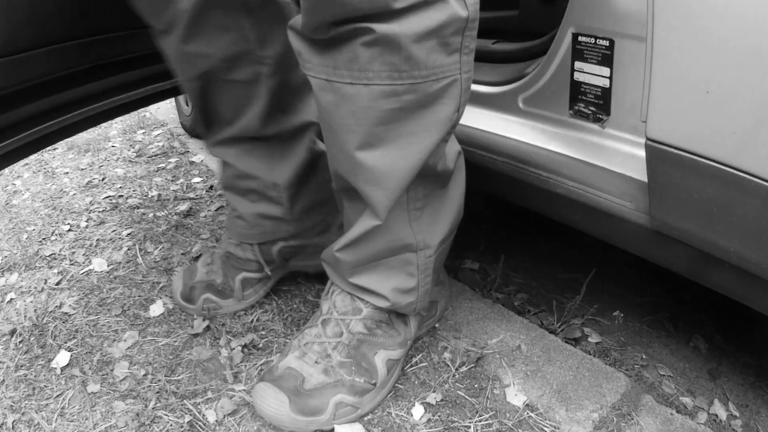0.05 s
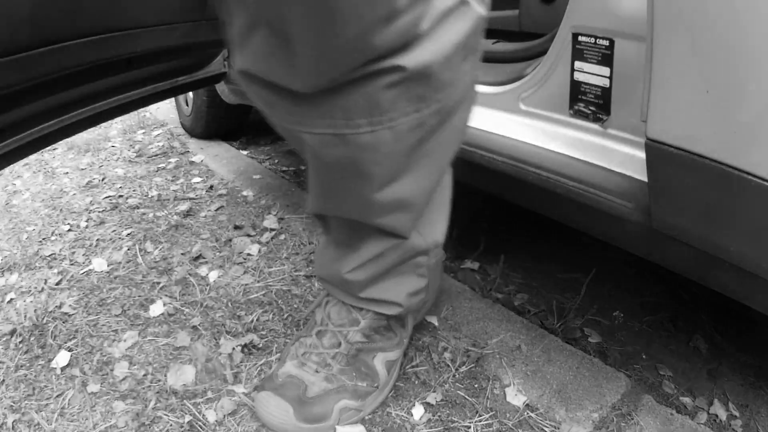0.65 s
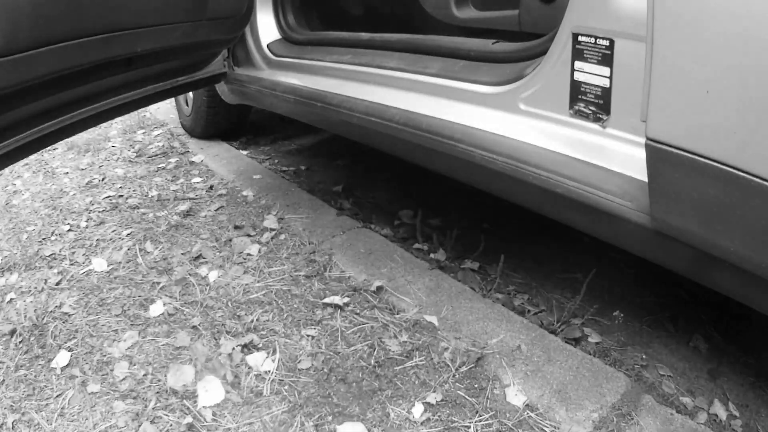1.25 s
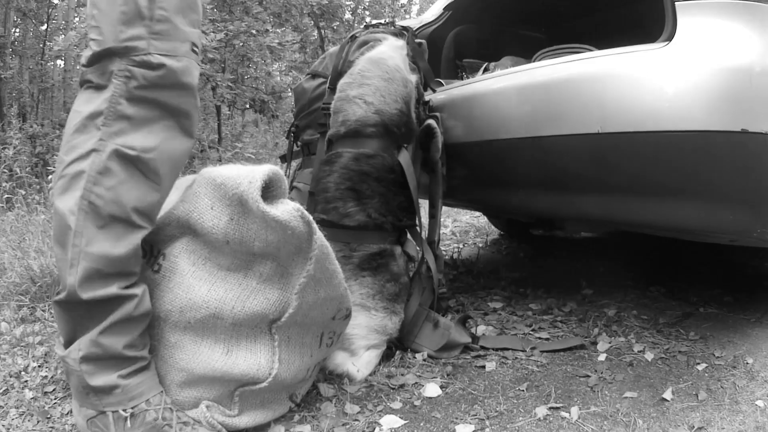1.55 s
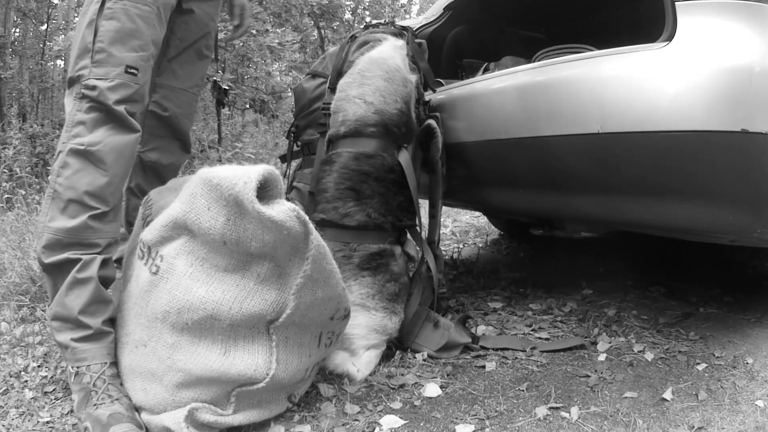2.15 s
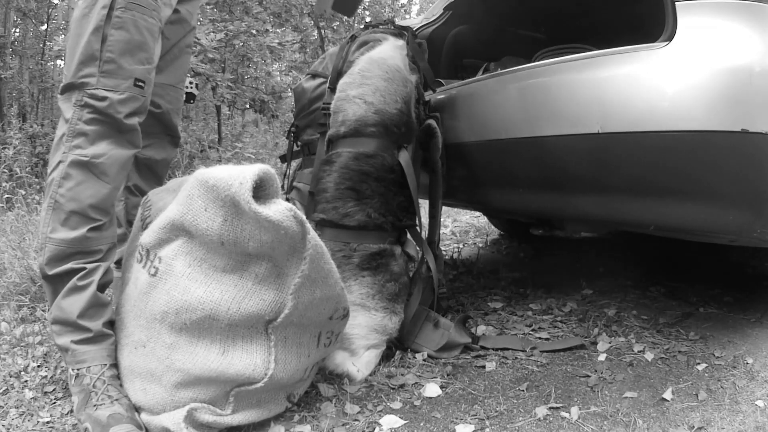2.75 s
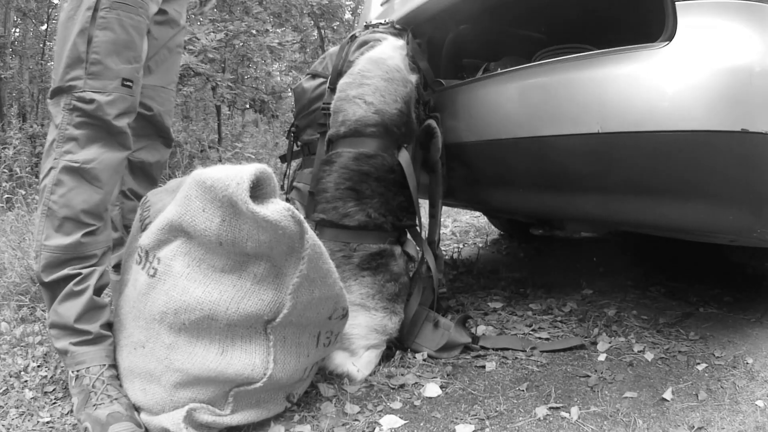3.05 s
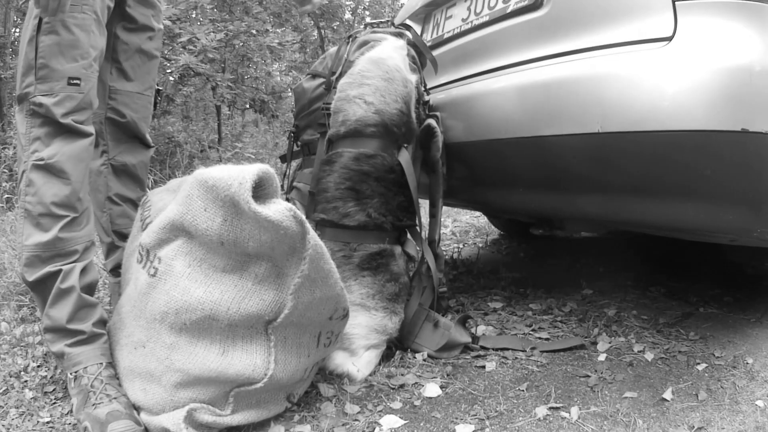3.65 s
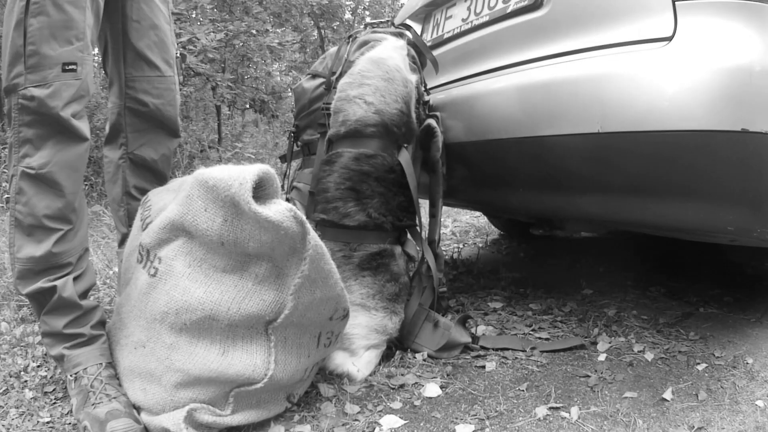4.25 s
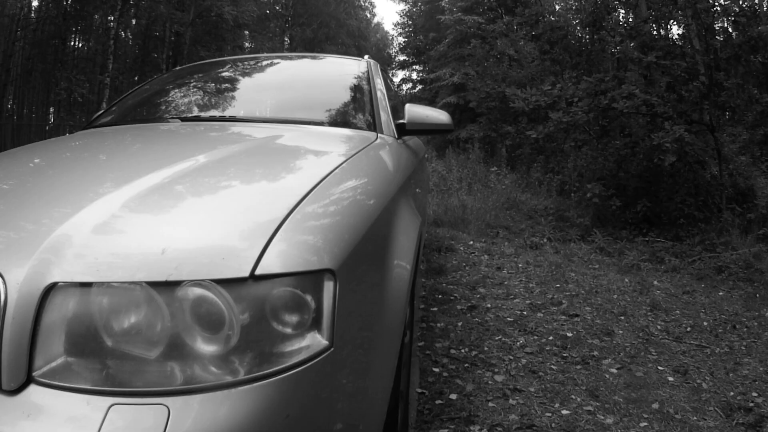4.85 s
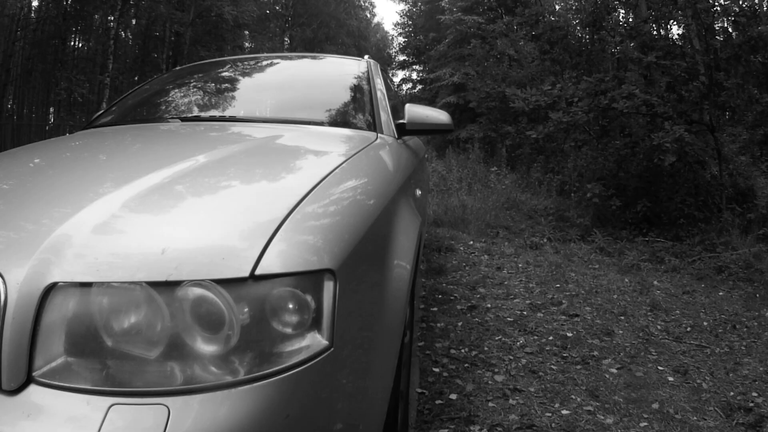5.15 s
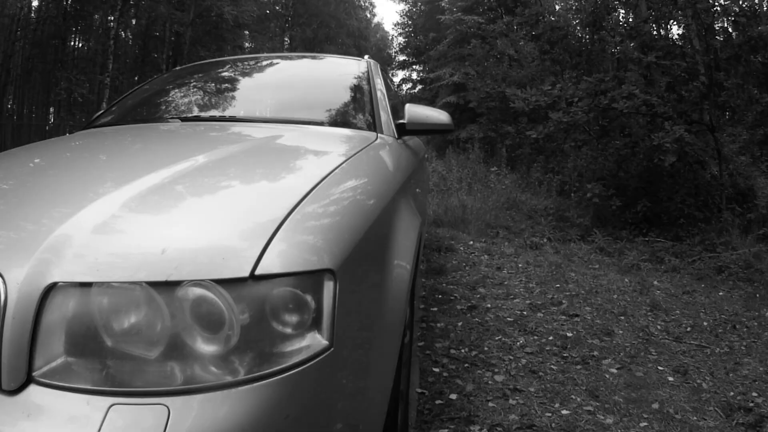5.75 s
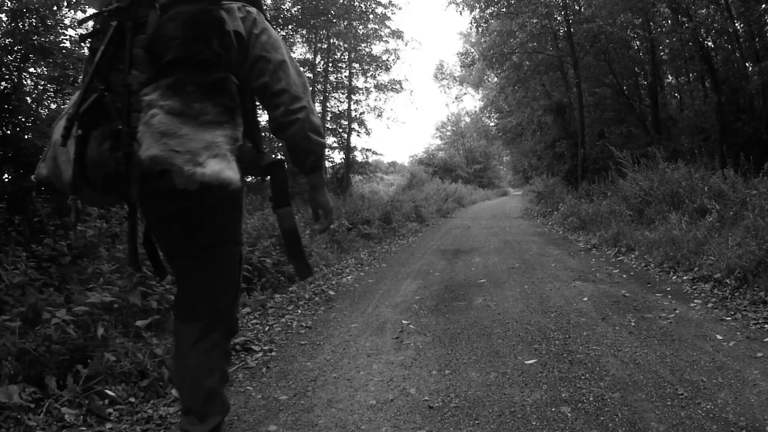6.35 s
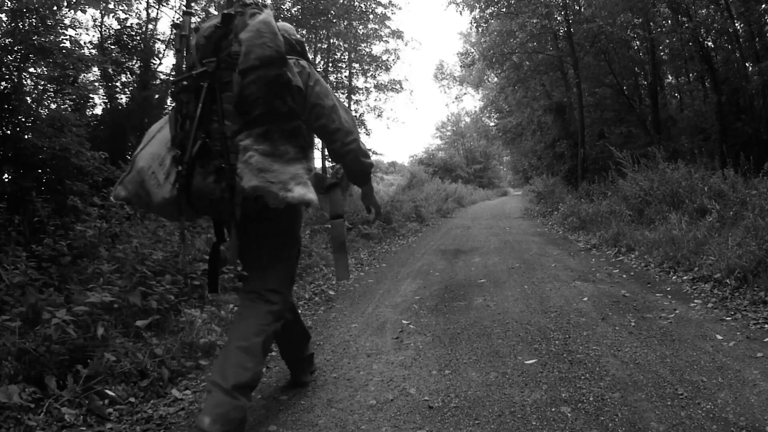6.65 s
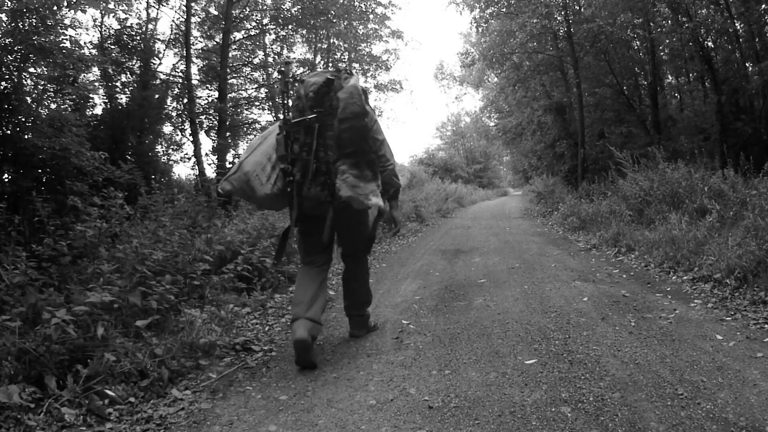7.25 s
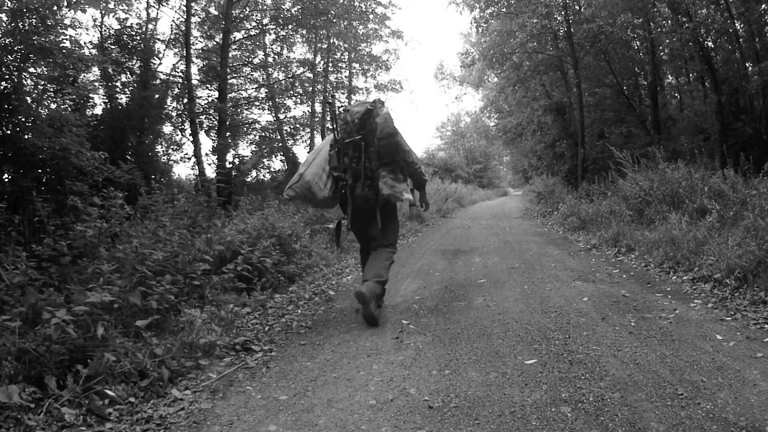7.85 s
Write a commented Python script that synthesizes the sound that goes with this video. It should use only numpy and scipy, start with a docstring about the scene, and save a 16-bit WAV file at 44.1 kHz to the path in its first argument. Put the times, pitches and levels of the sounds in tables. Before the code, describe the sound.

Leafy boot scuffs outdoors, followed by a trunk lid slamming, car door locks clunking and a few crunching steps on gravel.

```python
"""Boots shuffle on dry leaves and gravel beside a parked car, then crunch away along a woodland track.
Soles thud, grit grinds in tiny fractures, stones snap and the hiker's trouser legs swish.
Before the walk, a buckle tinkles, the trunk lid swings down and slams with a ring of sheet metal,
and the central locking clunks. A small stereo microphone with a peaky treble picks it all up
over a soft outdoor rush and its own hiss."""
import sys
import numpy as np
from scipy import signal
from scipy.fft import rfft, irfft
from scipy.io import wavfile
from scipy.ndimage import uniform_filter1d

SR = 44100
rng = np.random.default_rng(int(sys.argv[2]) if len(sys.argv) > 2 else 0)


def generate_wav(signal):
    """Clip the signal to [-1, 1] and save it as 16-bit WAV at the path in sys.argv[1]."""
    frames = np.transpose(np.atleast_2d(signal))
    scaled = np.clip(frames, -1, 1) * 32767
    pcm = np.round(scaled).astype(np.int16)
    wavfile.write(sys.argv[1], SR, pcm)


N = 348100
TIME = np.arange(N) / SR

# Tone colours of a dull sole, midrange gravel and crisp grit, also lent to the car and the buckle.
# Each row: frequency in Hz, relative level in dB.
SOLE_TONE = [(60, -18.5), (140, 0.5), (330, 1.5), (520, 3), (750, -4.5), (1100, -36)]
GRAVEL_TONE = [(400, -12), (750, 3.5), (1400, 0), (2300, -2), (3200, -6.5), (4500, -41)]
GRIT_TONE = [(1500, -19.5), (3000, 0), (5500, 1.5), (9500, -5.5), (12000, -26), (16000, -23)]
# Rustle of ground and gear under the moves. Each row: time in seconds, mid and treble levels in dB.
RUSTLE_BED = [(0, -45, -45), (.35, -52, -52), (.65, -52.5, -52.5), (1.1, -49.5, -53), (1.52, -54, -65),
              (1.62, -45, -51), (2.15, -49.5, -56), (2.5, -58, -60), (2.95, -54, -57), (3.601, -79.5, -81),
              (5.98, -60, -69), (6.08, -46, -53.5), (6.6, -46.5, -55), (6.9, -51.5, -55.5),
              (7.89, -49.5, -57)]


def boots(track_from_s=5.5, pebble_db=1.5, track_grind_db=-3, loose_db=-42):
    """The sole thuds and the ground grinds: dry leaves by the car, grit and pebbles on the track."""
    # Airy crackle of dry leaves. Each row: frequency in Hz, relative level in dB.
    leaf_tone = [(1800, -11.5), (3200, -3), (8500, -2.5), (11000, -18), (16000, -25.5)]
    sole, gravel, crisp = footwork()
    on_track = TIME > track_from_s
    thud = grains(per_s=630, spread_db=3.5, grain_s=0.0012, width_db=-18.5, bed_db=-3)
    grind = grains(per_s=2000, spread_db=4.5, grain_s=0.00044, width_db=-11.5, bed_db=-4)
    leaves = grains(per_s=2400, spread_db=3.5, grain_s=0.00077, width_db=-1.5, bed_db=-0.5)
    grit = grains(per_s=830, spread_db=2.5, grain_s=0.00039, width_db=-4.5, bed_db=-3.5)
    ground = colour(sole * thud, SOLE_TONE)
    ground += colour(gravel * grind * from_db(track_grind_db * on_track), GRAVEL_TONE)
    # Pebbles only move under real weight.
    shifting = from_db(pebble_db) * gravel ** 2 / (gravel + from_db(loose_db))
    track = colour(on_track * crisp * grit, GRIT_TONE) + on_track * shifting * pebbles()
    return ground + colour(~on_track * crisp * leaves, leaf_tone) + track


def footwork(low_db=-3):
    """Envelopes of sole, gravel and crackle: the single moves on top of the rustle bed."""
    mid_db, treble_db = in_time(RUSTLE_BED)
    return np.hypot(swells(shuffles() + strides()), from_db([mid_db + low_db, mid_db, treble_db]))


def shuffles(leaf_db=-1, muffling=0.21):
    """The more weight on a boot, the more it thuds and the less the leaves crackle."""
    # A boot drags or is set down. Each row: peak time, rise and fall in seconds, level and weight in dB.
    drags = [(0.258, 0.018, 0.012, -33, -10), (.81, 0.077, 0.14, -37.5, -7),
             (1.205, 0.023, 0.028, -28.5, -5.5), (1.227, .012, 0.011, -25, 7),
             (1.265, 0.0038, 0.0056, -33.5, 7.5), (1.403, 0.038, 0.031, -33, -1.5),
             (1.586, 0.019, 0.0077, -38.5, 10.5), (1.905, 0.11, 0.067, -35, 0.5),
             (2.317, 0.0041, 0.012, -36, 7)]
    return [(s, rise, fall, db + weight, db, db + leaf_db - muffling * weight)
            for s, rise, fall, db, weight in drags]


def strides(tread_db=-38.5, heel_lead_s=0.076, heel_db=-3, push_grit_db=2):
    """The heel lands softly, the sole rolls flat, then the trailing boot pushes off."""
    # Each row: time the sole rolls flat in seconds, gravel and grit levels in dB.
    steps = [(6.17, -41, -44.5), (6.717, -37.5, -39), (7.306, -38.5, -36), (7.873, -32.5, -40)]
    # Each row: peak time in seconds, level in dB, weight on the sole in dB.
    push_offs = [(6.391, -40.5, -4), (7.0, -40, 1.5), (7.538, -38, 4)]
    heel_s, roll_s, push_s = (0.01, 0.027), (0.041, 0.035), (0.011, 0.016)  # rise and fall
    heels = [(s - heel_lead_s, *heel_s, tread_db + heel_db, gravel + heel_db, grit + heel_db)
             for s, gravel, grit in steps]
    rolls = [(s, *roll_s, tread_db, gravel, grit) for s, gravel, grit in steps]
    pushes = [(s, *push_s, db + weight, db, db + push_grit_db) for s, db, weight in push_offs]
    return heels + rolls + pushes


def pebbles(per_s=170, spread_db=5.5, low_hz=1100, high_hz=4800, cycles=6, count=14):
    """Small stones click against each other, each at its own pitch, in a stream of even level."""
    hits = impacts(per_s, spread_db) * rng.choice([-1, 1], N)
    which = rng.integers(0, count, N)
    pitches = np.geomspace(low_hz, high_hz, count)
    clicks = sum(ring(hits * (which == k), hz, cycles / hz) for k, hz in enumerate(pitches))
    clicks = signal.lfilter(*signal.butter(2, low_hz / 2, "high", fs=SR), clicks)
    return clicks / np.sqrt(uniform_filter1d(clicks ** 2, size=2600) + 1e-4)


def stones(cycles=5.5, settle_s=0.0016, snap_t60=0.015, scatter_db=-19, scatter_t60=0.08):
    """Each stone gives a sharp snap, rings for a few cycles and scatters grit around it."""
    # The loudest knocks of stones, twigs and gear. Each row: start in seconds, level in dB, pitch in Hz.
    knocks = [(.017, -24.5, 4200), (.079, -21, 840), (.248, -17, 5260), (.309, -27, 600), (.642, -16, 850),
              (1.174, -9, 684), (1.585, -23, 4220), (1.767, -23.5, 5160), (1.872, -10.5, 1500),
              (1.874, -11, 296), (2.048, -26.5, 2000), (2.317, -15.5, 1780), (2.578, -27.5, 1170),
              (2.77, -26.5, 253), (2.771, -22, 980), (2.879, -26, 300), (6.384, -19.5, 1210),
              (6.449, -22, 1430), (6.533, -18, 1620), (6.638, -19.5, 1690), (6.7007, -6, 1370),
              (6.736, -18.5, 1520), (6.774, -23, 2640), (7.122, -14.5, 4750), (7.126, -20.5, 413),
              (7.178, -23, 4700), (7.236, -20, 5030), (7.251, -16, 2300), (7.309, -14, 1380),
              (7.322, -15, 2360), (7.799, -24.5, 900)]
    out, snaps, t = np.zeros((2, N)), np.zeros((2, N)), TIME[:3000]
    for s, db, hz in knocks + ticks():
        snap_db = -11.5 + 7.5 * np.log2(hz / 1500)  # smaller stones sound higher and sharper
        t60 = cycles / hz + settle_s
        knock = np.sin(2 * np.pi * hz * t) * dying(t, t60)
        knock -= 0.3 * np.sin(2 * np.pi * 2.4 * hz * t) * dying(t, t60 / 2)
        snap, grit = rng.standard_normal((2, 2, len(t)))
        band = signal.butter(2, [hz / 2, min(hz * 1.5, SR / 3)], "band", fs=SR, output="sos")
        grit = rms_one(signal.sosfilt(band, pair(*grit, -37.5)))
        add(out, s, from_db(db) * (knock + from_db(scatter_db) * grit * dying(t, scatter_t60)))
        add(snaps, s, from_db(db + snap_db) * pair(*snap, -4.5) * dying(t, snap_t60))
    return out + 0.55 * colour(snaps, GRIT_TONE)


def ticks(count=160, per_s=11, above_rustle_db=17, spread_db=5, low_hz=900, high_hz=5500):
    """Small stones and leaves tick at random, riding the rustle's treble; gives rows for stones()."""
    wait, strength, pitch = rng.random((count, 3)).T
    s = np.cumsum(-np.log(1 - wait)) / per_s
    at, _, treble_db = np.transpose(RUSTLE_BED)
    db = np.interp(s, at, treble_db) + above_rustle_db + spread_db * (2 * strength - 1)
    hz = low_hz * (high_hz / low_hz) ** pitch
    return list(np.transpose([s, db, hz])[s < TIME[-1]])


def lid_swing():
    """Hinges and rubber rub as the lid comes down."""
    # Each row: peak time, rise and fall in seconds, then low, mid and high levels in dB.
    rubs = [(3.19, 0.0042, 0.019, -28, -23.5, -31.5), (3.222, 0.028, 0.023, -30, -29.5, -33),
            (3.262, 0.018, 0.012, -22.5, -22.5, -28.5)]
    low, mid, high = swells(rubs)
    rub = colour(low * noise(-25.5), SOLE_TONE) + colour(mid * noise(-13), GRAVEL_TONE)
    scrape = grains(per_s=1800, spread_db=9, grain_s=0.0007, width_db=-5, bed_db=-0.5)
    return rub + colour(high * scrape, GRIT_TONE)


def lid_slam(thump_t60=0.045, panel_t60=0.08, latch_t60=0.056, force_db=3, modes_db=-10,
             seal_s=0.0031, crack_db=8, crack_t60=0.006):
    """A volley of contacts with latch, seal and stops shakes the shell and rings the sheet metal."""
    # Each row: start in seconds, then thump, panel and latch levels in dB.
    contacts = [(3.3083, -21, -18.5, -21), (3.3209, -24, -25.5, -21), (3.337, -30, -21, -33),
                (3.3505, -12.5, -17.5, -26), (3.359, -8.5, -37.5, -26.5), (3.376, -8, -20, -25.5),
                (3.395, -24.5, -25.5, -24), (3.431, -44, -30.5, -33)]
    # Sheet-metal modes. Each row: frequency in Hz, relative level in dB, 60 dB decay time in seconds.
    lid_modes = [(117, -4.5, 0.19), (142, -2, 0.22), (314, -7, 0.2), (510, 0.5, 0.18), (714, -4, 0.13),
                 (1170, -4, 0.13), (1370, -5.5, 0.087), (1560, -15, 0.13), (2000, -13.5, 0.13)]
    # Deep thump, hollow panel, bright latch. Each row: frequency in Hz, relative level in dB.
    thump_tone = [(40, -11), (140, 7.5), (250, 6.5), (400, -6.5), (700, -42.5)]
    panel_tone = [(180, -7.5), (330, 2.5), (650, -2), (850, -5.5), (1300, -0.5), (2200, -9.5),
                  (3500, -33.5)]
    latch_tone = [(1800, -9), (3300, 5), (5200, 4.5), (10500, -7), (13000, -34.5)]
    s, thump_db, panel_db, latch_db = np.transpose(contacts)
    out, t = np.zeros((2, N)), TIME[:SR // 2]
    cushioned = dying(t, thump_t60) * (1 - np.exp(-t / seal_s))  # the rubber seal slows the attack
    layers = [(thump_db, cushioned, thump_tone, -20),
              (panel_db, dying(t, panel_t60), panel_tone, -11),
              (latch_db, dying(t, latch_t60), latch_tone, -2)]
    for levels, envelope, tone, width_db in layers:
        power = np.zeros(N)
        for at, db in zip(s, levels):
            add(power, at, (from_db(db + force_db) * envelope) ** 2)
        shake = colour(noise(width_db), tone)
        shake_power = uniform_filter1d(np.mean(shake ** 2, axis=0), size=500)
        out += shake * np.sqrt(power / (shake_power + 1e-9))
    for at, db in zip(s[:2], latch_db):  # the first two contacts are the hard steel of the latch
        crack = uniform_filter1d(rng.standard_normal((2, len(t))), size=2)
        add(out, at, from_db(db + crack_db) * dying(t, crack_t60) * crack)
    for hz, db, t60 in lid_modes:
        clicks = np.zeros(N)
        strength_db = panel_db + db + modes_db + rng.normal(0, 3.8, len(s))
        clicks[np.round(s * SR).astype(int)] = from_db(strength_db) * rng.choice([-1, 1], len(s))
        out += ring(clicks, hz, t60)
    return out


def trapped_air(at_s=3.348, hz=58, db=-20, t60=0.12):
    """The air shut in behind the lid gives one low push."""
    return from_db(db) * np.sin(2 * np.pi * hz * (TIME - at_s)) * dying(TIME - at_s, t60)


def central_lock():
    """A relay clicks, the lock motors shove their bolts twice, and the hollow doors boom on."""
    # Each row: peak time, rise and fall in seconds, then boom, whirr and rattle levels in dB.
    clunks = [(4.601, .0006, 0.0023, -60, -53, -40.5), (4.62, 0.0083, 0.0064, -30, -35.5, -52),
              (4.665, 0.02, 0.02, -24, -36, -51), (4.72, .03, .05, -44, -57, -72)]
    # Body of a hollow door. Each row: frequency in Hz, relative level in dB.
    door_tone = [(50, -22), (140, 7.5), (330, -3.5), (480, 6.5), (600, -7.5), (720, 1.5), (1300, -31)]
    boom, whirr, rattle = swells(clunks)
    doors = colour(boom * noise(-21), door_tone)
    return doors + colour(whirr * noise(-9), GRAVEL_TONE) + colour(rattle * noise(-5), GRIT_TONE)


def buckle(tick_db=-5, tick_t60=0.042, tilt_pivot_hz=7420):
    """Every touch gives a dry tick and rings the modes unevenly; where it lands sets the brightness."""
    # Each row: start in seconds, level in dB, tilt in dB per octave.
    touches = [(1.637, -27, 1), (2.104, -34.5, 1), (4.075, -49, -9), (4.321, -43.5, -8), (4.347, -54, -9),
               (4.402, -43.5, 2)]
    # Each row: frequency in Hz, relative level in dB, 60 dB decay time in seconds.
    buckle_modes = [(5220, -24, 0.023), (7420, -5.5, 0.037), (9630, -8.5, 0.027), (11270, -14, 0.027)]
    s, level_db, tilt = np.transpose(touches)
    out, tick_envelope = np.zeros((2, N)), np.zeros(N)
    for hz, db, t60 in buckle_modes:
        clicks = np.zeros((2, N))
        strength_db = level_db + db + tilt * np.log2(hz / tilt_pivot_hz)
        clicks[:, np.round(s * SR).astype(int)] = from_db(strength_db + rng.normal(0, 9.3, (len(s), 2)).T)
        out += ring(clicks, hz, t60)
    for at, db in zip(s, level_db):
        add(tick_envelope, at, from_db(db + tick_db) * dying(TIME[:SR // 10], tick_t60))
    return out + colour(tick_envelope * noise(1), GRIT_TONE)


def trousers():
    """Stiff cloth slides over cloth with a smooth, airy hiss."""
    # The legs brush past each other. Each row: peak time, rise and fall in seconds, level in dB.
    brushes = [(.23, .018, .025, -36), (.89, 0.091, 0.11, -45.5), (1.38, 0.061, 0.044, -40)]
    # Each row: frequency in Hz, relative level in dB.
    cloth_tone = [(6500, -13), (9000, 4), (15000, -24)]
    swish, = swells(brushes)
    return colour(swish * noise(1.5), cloth_tone)


def whistle(waver=0.023):
    """One faint, high, slightly unsteady note."""
    # Each row: time in seconds, pitch in Hz, level in dB.
    contour = [(2.13, 2240, -73), (2.16, 2270, -45), (2.21, 2250, -45), (2.25, 2300, -63)]
    hz, db = in_time(contour)
    wobble = rms_one(uniform_filter1d(rng.standard_normal(N), size=200))
    sounding = (TIME > contour[0][0]) & (TIME < contour[-1][0])
    return from_db(db) * sounding * np.sin(2 * np.pi * np.cumsum(hz * (1 + waver * wobble)) / SR)


def surroundings(dry, near_db=-13, near_t60=0.068, far_db=-25, far_t60=0.35, far_cut_hz=3500):
    """Quick scatter from ground and car, then a faint dull tail from the trees."""
    t = TIME[:SR // 2]
    near, far = rng.standard_normal((2, 2, len(t)))
    side = np.diff(near[1], prepend=0)  # close ports differ only in the treble
    near = pair(near[0], side, -0.5) * dying(t - 0.003, near_t60)
    far = signal.lfilter(*signal.butter(1, far_cut_hz, fs=SR), pair(*far, -20)) * dying(t - 0.02, far_t60)
    echo = (from_db(near_db) * rms_one(near) + from_db(far_db) * rms_one(far)) / np.sqrt(len(t))
    return dry + signal.oaconvolve(dry, echo, axes=1)[:, :N]


def background(wide_above_hz=1500, waver_db=1.3):
    """The gently wavering rush of the woods, narrow in the bass and wide on top, and microphone hiss."""
    # Both dip for a second after the slam. Each row: time in seconds, rush and hiss levels in dB.
    bed_levels = [(0, -48.5, -60), (3.1, -45.5, -60), (3.4, -50, -65), (3.55, -59.5, -77),
                  (3.7, -65.5, -81), (4.38, -60, -71.5), (4.44, -46, -59), (5.2, -46.5, -60),
                  (7.89, -50.5, -58.5)]
    # Dark rush, bright hiss. Each row: frequency in Hz, relative level in dB.
    rush_tone = [(25, -10), (60, -8.5), (140, 3), (260, -0.5), (400, -5.5), (900, -7.5), (1500, -16),
                 (3000, -25.5), (6000, -39.5), (12000, -37)]
    hiss_tone = [(500, -10), (3000, -5.5), (5000, -9), (6800, -6.5), (8700, 3), (11000, 3), (16000, 5.5)]
    rush_db, hiss_db = in_time(bed_levels)
    mid, side = rng.standard_normal((2, N))
    side = 0.3 * side + 0.72 * signal.lfilter(*signal.butter(1, wide_above_hz, "high", fs=SR), side)
    rush = rms_one(colour(pair(mid, side, 0), rush_tone))
    waver = rms_one(uniform_filter1d(uniform_filter1d(rng.standard_normal(N), size=4000), size=4000))
    return from_db(rush_db + waver_db * waver) * rush, from_db(hiss_db) * colour(noise(0), hiss_tone)


def ports(sound):
    """Each microphone port has its own peaks and notches."""
    # Each row: frequency in Hz, Q, left and right gains in dB.
    resonances = [(2656, 14, -4.5, -5), (5053, 2.87, 8.5, 9.5), (6870, 3.66, -6.5, -7), (8550, 9, 5, -9.5)]
    out = sound.copy()
    for hz, q, *sides_db in resonances:
        w = 2 * np.pi * hz / SR
        alpha = np.sin(w) / (2 * q)
        for side, db in enumerate(sides_db):
            g = from_db(db / 2)
            out[side] = signal.lfilter([1 + alpha * g, -2 * np.cos(w), 1 - alpha * g],
                                       [1 + alpha / g, -2 * np.cos(w), 1 - alpha / g], out[side])
    return out


def impacts(per_s, spread_db):
    """Clicks at random moments, mostly small, a few large."""
    return from_db(spread_db * np.minimum(rng.exponential(1, N), 4)) * (rng.random(N) < per_s / SR)


def grains(per_s, spread_db, grain_s, width_db, bed_db):
    """Tiny fractures, each a short burst, on a bed of friction noise; even in level."""
    power = signal.lfilter([1], [1, -np.exp(-2 / (grain_s * SR))], impacts(per_s, spread_db) ** 2 + 1e-12)
    power /= uniform_filter1d(power, size=1300) + 1e-9
    bed = from_db(bed_db) ** 2
    return np.sqrt((np.abs(power) + bed) / (1 + bed)) * noise(width_db)


def swells(rows, roundness=0.08):
    """One envelope for each level column; each row builds to a rounded peak and dies away."""
    t, rows = TIME[::20], np.array(rows)
    since = t - rows[:, :1]
    away = np.where(since < 0, -since / rows[:, 1:2], since / rows[:, 2:3])
    power = np.exp(roundness - 2 * np.hypot(away, roundness))
    return [np.interp(TIME, t, np.sqrt(band)) for band in from_db(rows[:, 3:].T) ** 2 @ power]


def colour(x, tone, skirt_db=9, size=4096):
    """An EQ of unit power gain that follows a tone table and falls skirt_db an octave past its ends."""
    hz, db = np.transpose(tone)
    octave, points = np.log2(np.arange(size // 2 + 1) * SR / size + 5), np.log2(hz)
    beyond = np.abs(octave - np.clip(octave, points[0], points[-1]))
    gain = rms_one(from_db(np.interp(octave, points, db) - skirt_db * beyond))
    cepstrum = irfft(np.log(gain))
    cepstrum[1:size // 2] *= 2  # minimum phase: nothing rings ahead of an attack
    cepstrum[size // 2 + 1:] = 0
    return signal.oaconvolve(x, irfft(np.exp(rfft(cepstrum)))[None], axes=1)[:, :N]


def ring(clicks, hz, t60):
    """A unit click sets a sine of height 1 ringing."""
    r, w = from_db(-60 / (t60 * SR)), 2 * np.pi * hz / SR
    return signal.lfilter([0, np.sin(w)], [1, -2 * r * np.cos(w), r * r], clicks + 1e-18)


def pair(mid, side, width_db):
    """Left and right from a shared and an opposed part."""
    width = from_db(width_db)
    return (mid + width * side * np.array([[1], [-1]])) / np.sqrt(1 + width ** 2)


def noise(width_db):
    return pair(*rng.standard_normal((2, N)), width_db)


def dying(t, t60):
    return np.exp(-np.log(1000) * np.maximum(t, 0) / t60) * (t >= 0)


def add(out, s, sound):
    start = round(s * SR)
    out[..., start:start + sound.shape[-1]] += sound[..., :N - start]


def in_time(rows):
    s, *columns = np.transpose(rows)
    return [np.interp(TIME, s, column) for column in columns]


def from_db(db):
    return 10 ** (np.asarray(db) / 20)


def rms_one(x):
    return x / np.sqrt(np.mean(x ** 2) + 1e-20)


def scene():
    """Hiker and car among the trees, heard through the two microphone ports."""
    feet = boots() + stones()
    feet[1] = np.roll(feet[1], 1)  # the hiker is left of centre, so the right port hears the steps later
    car = lid_swing() + lid_slam() + trapped_air() + central_lock()
    sources = surroundings(feet + trousers() + car + buckle() + whistle())
    rush, hiss = background()
    balance = from_db([[-0.9], [0.3]])
    return ports((sources + rush) * balance) + hiss


def record(dry, low_cut_hz=45, high_cut_hz=15900):
    """The deep bass is thinned, peaks are rounded, the top is cut."""
    thinned = signal.sosfilt(signal.butter(2, low_cut_hz, "high", fs=SR, output="sos"), dry)
    return signal.sosfilt(signal.ellip(12, 0.1, 80, high_cut_hz, fs=SR, output="sos"), np.tanh(thinned))


dry = scene()
out = record(dry)
generate_wav(out)
```